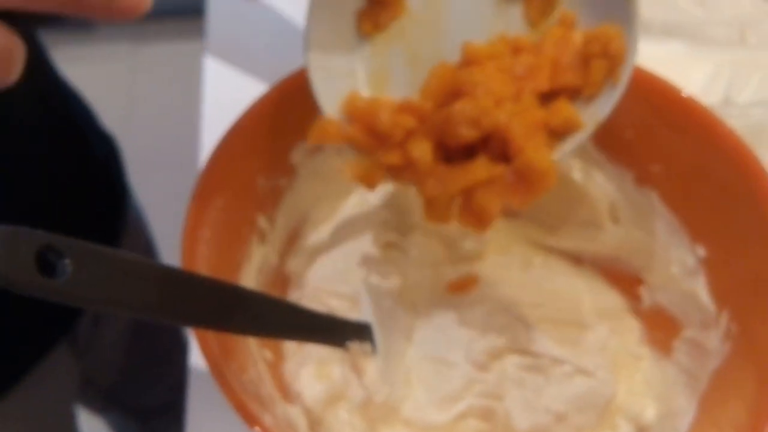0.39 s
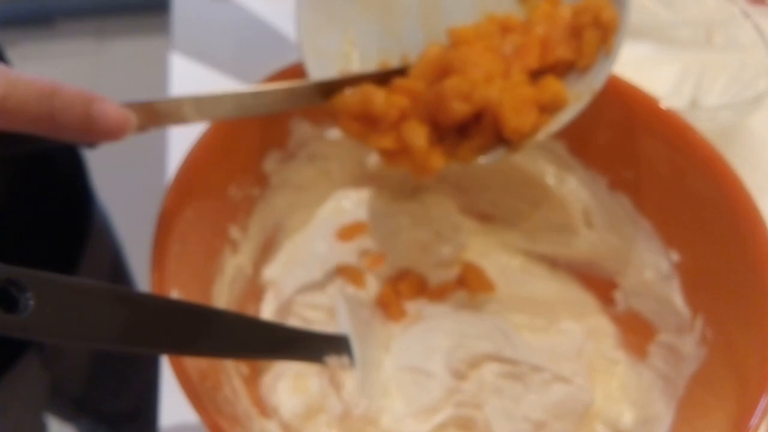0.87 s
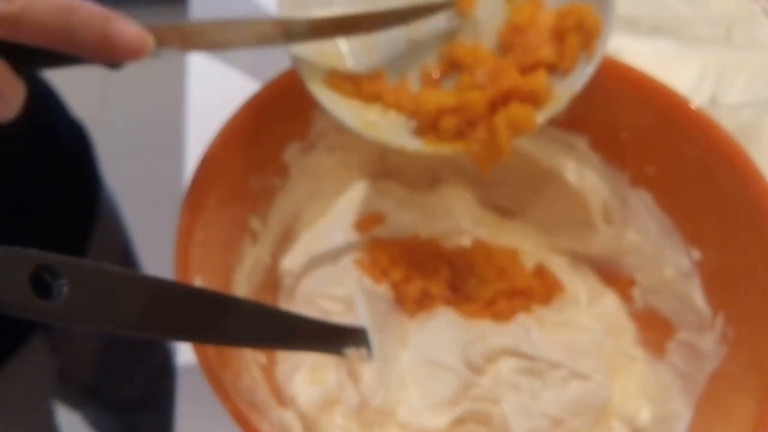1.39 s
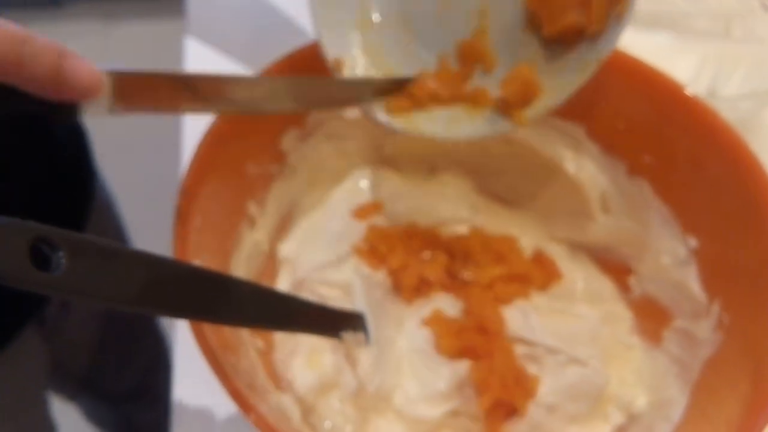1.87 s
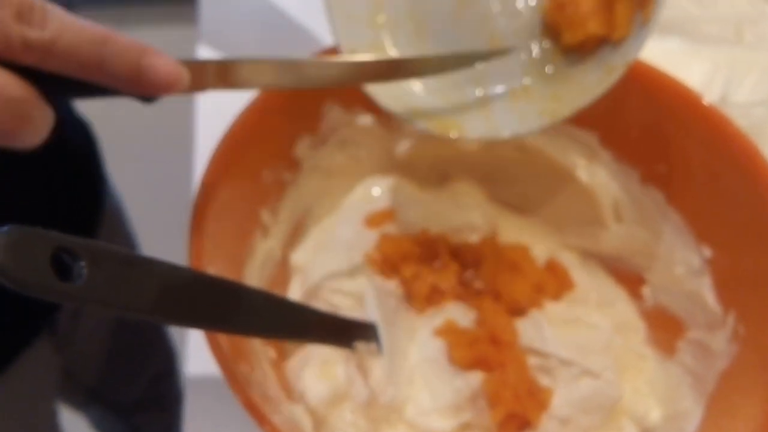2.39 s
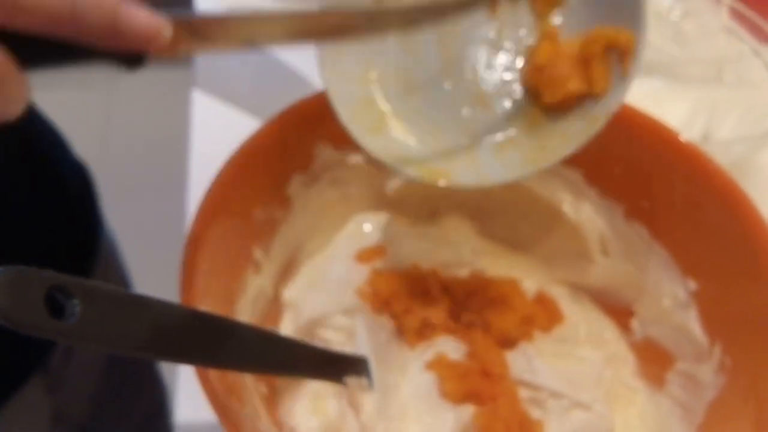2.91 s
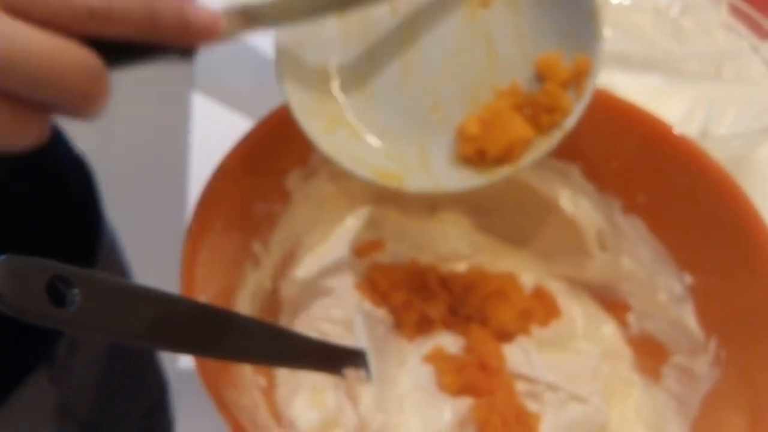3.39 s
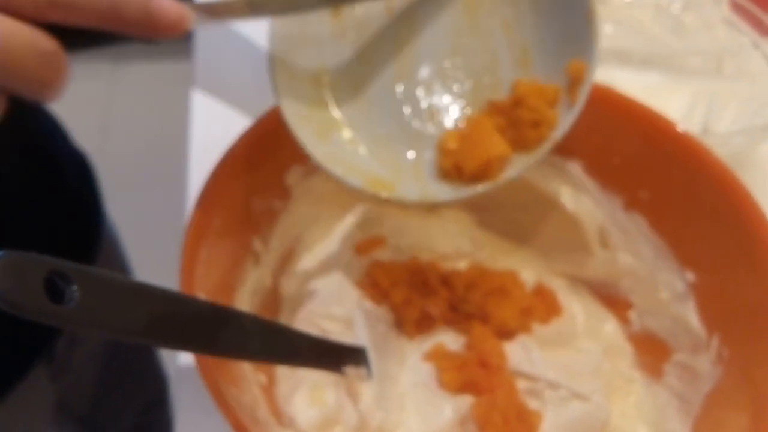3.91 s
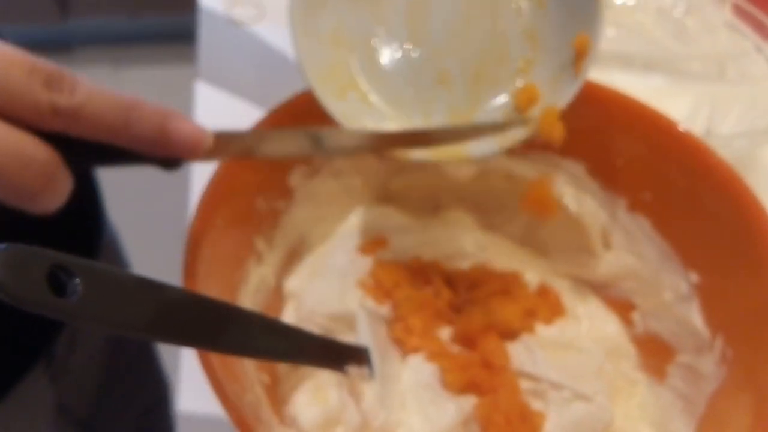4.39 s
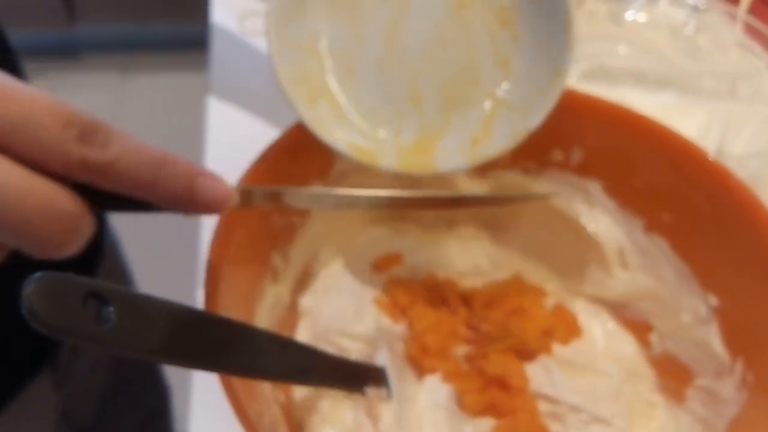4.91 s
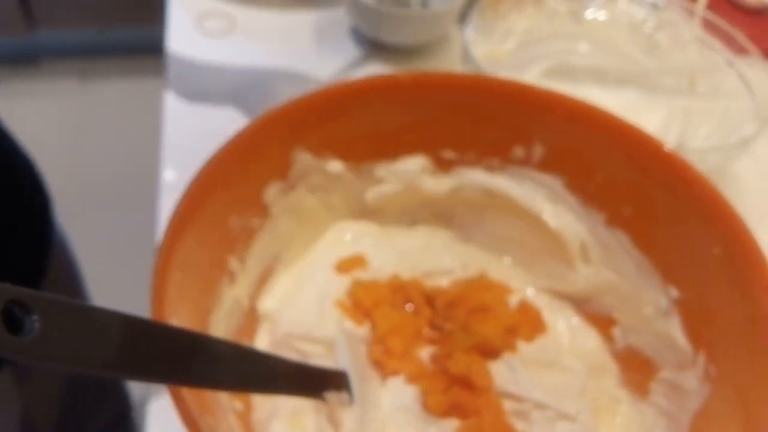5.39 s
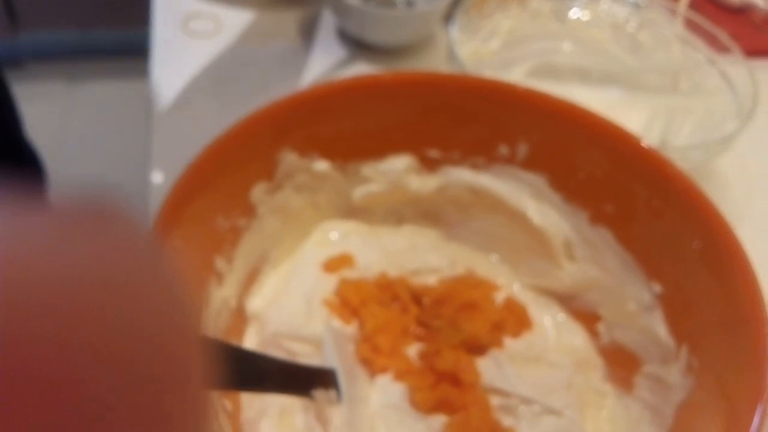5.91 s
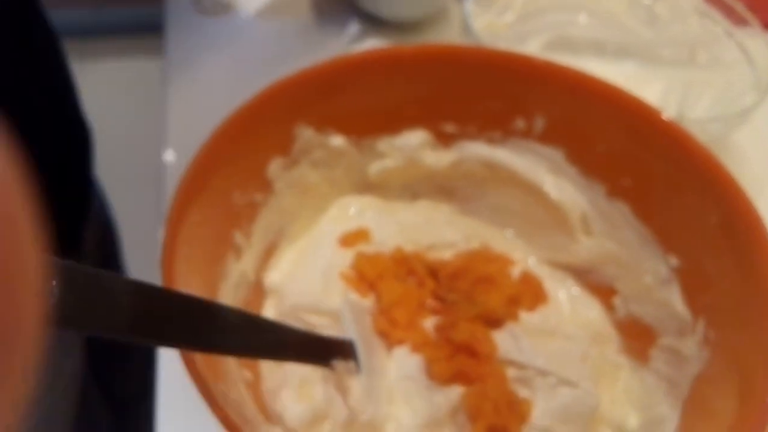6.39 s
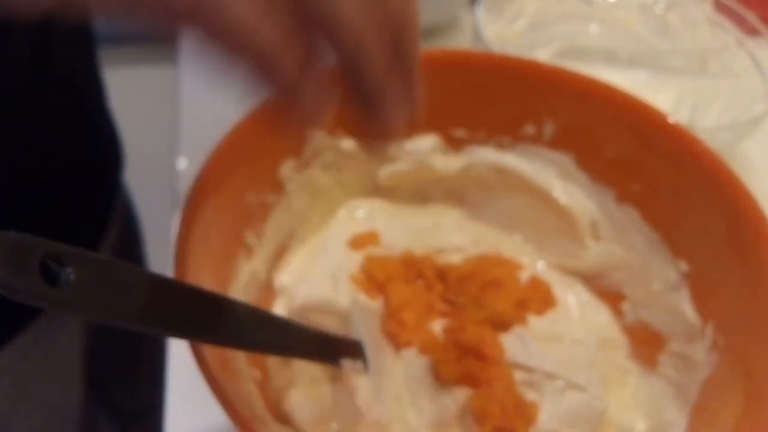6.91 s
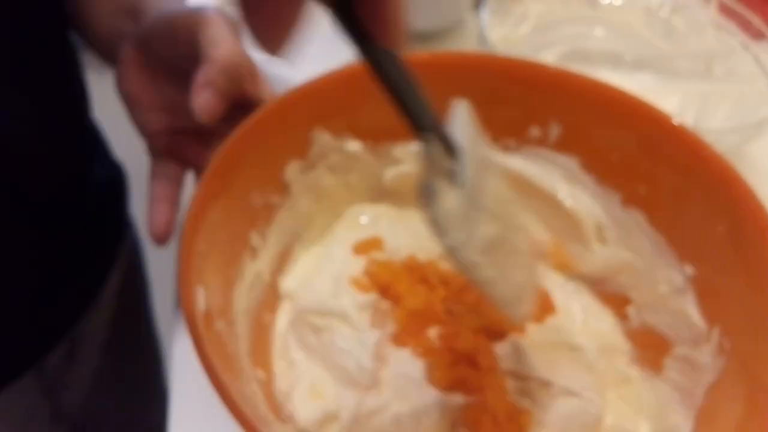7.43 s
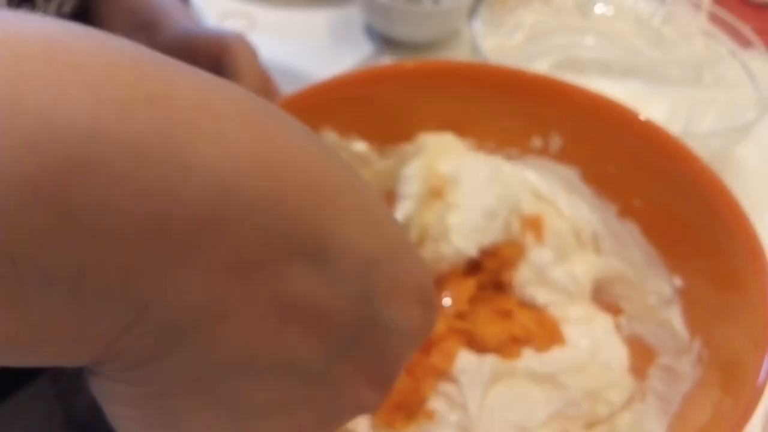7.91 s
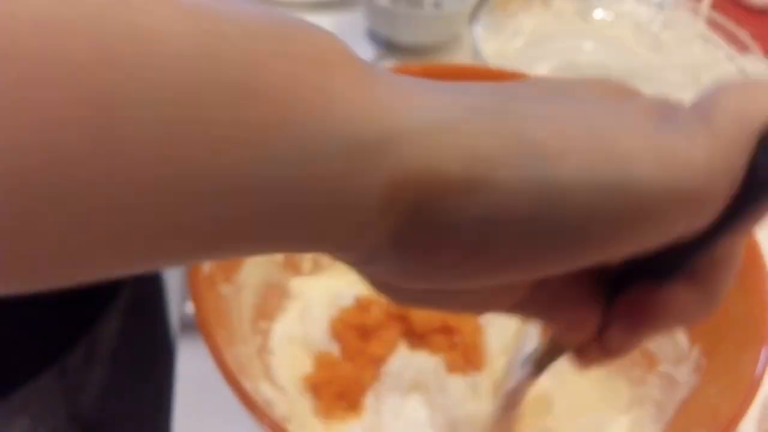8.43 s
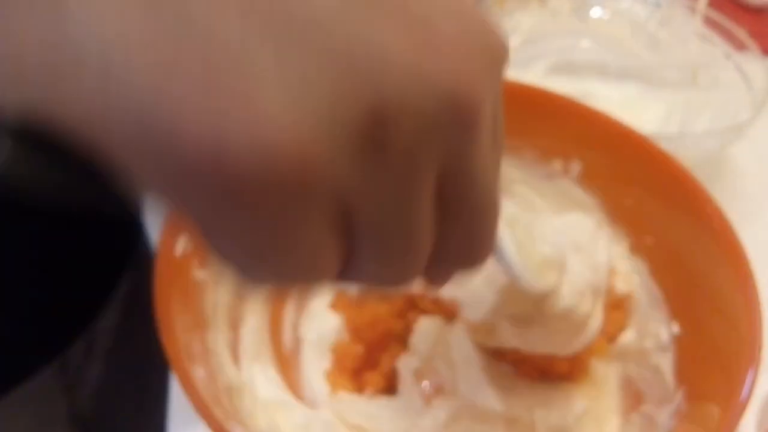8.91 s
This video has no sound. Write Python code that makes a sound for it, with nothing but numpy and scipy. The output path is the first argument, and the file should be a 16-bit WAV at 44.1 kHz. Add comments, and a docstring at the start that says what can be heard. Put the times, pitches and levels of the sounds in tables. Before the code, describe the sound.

Knife-on-dish taps come first, each short, hard and bright, many with a brief gritty scrape. They thin out after about five seconds, with a few last contacts before seven. Then damped plastic knocks, one prominent, and faint soft stirring of cream take over, fading to tiny bumps. A close two-sided microphone in a lightly reverberant kitchen catches low handling rumble, hum and quiet hiss; the dish is crisper on the right.

```python
"""Knife on a dish, spatula on a bowl

A steel knife taps and scrapes fruit off a small ceramic dish: short noise bursts and a chattering rasp
drive the dish's modes. A few knocks come early; most of the spatula's knocking on a plastic bowl, damped
tones with cracks, follows the knife, with stirring. Two microphone ports hear it in a kitchen: for the
dish, the right one is bright and the left one dull. Soft bowl tones, rumble from the counter, folding
cream and room air, all but the tones noise, lie below.
"""
import sys
import numpy as np
from scipy import signal
from scipy.fft import rfft, irfft
from scipy.io import wavfile
from scipy.ndimage import uniform_filter1d

SR = 44100
rng = np.random.default_rng(int(sys.argv[2]) if len(sys.argv) > 2 else 0)


def ratio_of_db(decibels):
    """Turn decibels (scalar or array-like) into linear amplitude factors; 0 dB maps to 1."""
    return 10 ** (np.asarray(decibels, float) / 20)


def to_wav(sig):
    """Store sig (one row per channel, or 1-D mono) as 16-bit WAV at the path in sys.argv[1].

    Samples outside -1..1 are clipped; the rate is SR.
    """
    pcm = np.clip(np.atleast_2d(sig), -1, 1) * 32767
    pcm = np.round(pcm).astype(np.int16)
    wavfile.write(sys.argv[1], SR, pcm.T)  # frames by channels


N = 398663  # length in samples

# Knife meets dish. Each row: start in seconds, relative level in dB, body in dB (how hard the flat of
# the blade drives the lower modes), edge in dB on the upper modes.
KNIFE_TAPS = [(0.037, -46, -14, -6), (0.0858, -31, -6.5, 11), (0.4301, -22, -8, -8), (0.507, -35, -11, -3),
              (0.6196, -42.5, -1, -16), (0.8329, -21, -10, -4), (0.8749, -26.5, -4.5, -4),
              (0.9547, -23, -4, 4.5), (0.9929, -23, -18, -8), (1.0711, -35, 10.5, -17),
              (1.1303, -40.5, 21, -20), (1.2877, -31.5, -23, -28), (1.31, -50, -2, -8),
              (1.4217, -44, -5, -20), (1.4309, -35, -1, -31), (1.533, -22.5, 3, 5),
              (1.6405, -16.5, -23, -16), (1.9209, -14.5, -8.5, -10), (2.3041, -21.5, -6.5, -0.5),
              (2.371, -16.5, -7.5, -4.5), (2.604, -12.5, -11.5, -18), (2.821, -20.5, -7.5, -1),
              (2.8672, -13.5, -18, -6), (3.1553, -20.5, -10, -5), (3.4708, -15.5, -15, -21),
              (3.5512, -12.5, -24, -3.5), (3.7374, -17.5, -9, -11), (3.829, -28, -25, 9),
              (4.0386, -22.5, 0, -27), (4.0852, -23.5, -12, 7), (4.3194, -22.5, 8.5, -0.5),
              (4.3433, -17.5, -2, -9.5), (4.3613, -22, -3, -12), (4.3721, -22.5, -2, -18),
              (4.3804, -17.5, -12, -14), (4.4394, -25, -16, -4), (4.6314, -19, -11.5, -4),
              (4.716, -23.5, -7.5, 0.5), (4.911, -22, 0, 12), (4.9634, -13, -9.5, -11),
              (5.5226, -18.5, -16.5, -16), (5.835, -26.5, -16, -16), (6.1454, -42.5, -12, 2),
              (6.353, -32, -1, -15), (6.399, -22.5, 10.5, -25), (6.6055, -21.5, -1.5, -16),
              (6.6645, -20.5, 7.5, -19)]
# Blade drags over the glaze. Each row: start in seconds, seconds until it presses hardest, relative
# pressure in dB, body in dB, edge in dB.
KNIFE_STROKES = [(0.0, 0.054, -49.5, -4, 8), (0.076, 0.046, -36.5, -14.5, 7.5),
                 (.28, 0.015, -63.5, 6.5, -6), (0.434, .015, -42.5, -2.5, 0), (.47, 0.066, -47.5, -12, -1),
                 (0.615, 0.043, -44, -6.5, 6.5), (.838, 0.036, -40.5, -3.5, 4), (.91, 0.076, -43.5, -6, 9),
                 (0.969, 0.029, -35.5, 1.5, -2), (1.068, 0.014, -39, 2.5, -8), (1.125, 0.0081, -43, 5, 2),
                 (1.542, 0.046, -30.5, 0.5, 4), (1.599, 0.032, -24, -8.5, -5), (1.66, 0.056, -42, -14, 5.5),
                 (1.925, 0.033, -26.5, -21, -4), (1.96, 0.054, -41, -9, 2), (2.07, 0.028, -54, -4, 10),
                 (2.308, .015, -33.5, -13, -1), (2.371, 0.025, -32, -13, -5), (2.58, .012, -59, -14, -7),
                 (2.61, 0.027, -32, -13, -3), (2.826, 0.018, -27.5, -18, -8),
                 (2.867, 0.04, -25.5, -18.5, -5), (3.04, 0.064, -54, -3, -2),
                 (3.16, 0.0094, -29.5, -11.5, 3.5), (3.2, 0.052, -47, -11.5, -10),
                 (3.478, 0.027, -35.5, -13, -6), (3.551, 0.0092, -28.5, -18.5, 8),
                 (3.744, 0.019, -38, -9, -1), (3.8, 0.045, -32.5, -13, 4), (4.045, .015, -51, -8, 6),
                 (4.087, 0.02, -30.5, -11, 4), (4.325, 0.023, -31.5, 0, 4),
                 (4.355, 0.038, -24.5, -8.5, -12), (4.42, 0.048, -33.5, -15, -4),
                 (4.638, 0.018, -40, -4, 2.5), (4.71, 0.0072, -37.5, -15, -7), (4.913, 0.015, -34.5, -3, 2),
                 (4.962, 0.038, -28, -20, -5), (5.529, 0.028, -31.5, -13, -0.5),
                 (5.69, 0.024, -43.5, -12, -3), (5.824, 0.032, -39.5, -13.5, -5),
                 (5.88, 0.032, -50, -7.5, 5), (6.148, .02, -53.5, -7, 8), (6.179, 0.0099, -49, 0.5, 3),
                 (6.2, .05, -50.5, 5.5, 3), (6.355, 0.023, -41, -3, -6), (6.4, 0.023, -33, 12.5, 2.5),
                 (6.44, 0.057, -36, 6, 4), (6.61, 0.035, -37.5, 0.5, 2), (6.664, 0.019, -26, -1, -11),
                 (6.7, 0.039, -34, 0.5, -2)]
# A drag starts below its top pressure, then the blade lifts away.
LANDS_DB, LIFTS_DB_PER_S = -5, 251.5
# Share of the body control that the lowest, low and middle mode groups follow (ratio).
BODY_SHARE = [0.96, 1, 0.53]
# Fixed level of the same three groups (dB).
BODY_OFFSET_DB = [-1, 2.5, 1]

# Crossovers between the five groups of dish modes (Hz).
GROUP_SPLITS_HZ = [2000, 3800, 5900, 7500]
# Dish modes. Each row: frequency in Hz, level in dB, time to fade 60 dB in seconds.
DISH_MODES = [(908, -8, .06), (1147, -8, .04), (1540, -2, .04), (2009, -9, .07), (2237, -6, .09),
              (2346, -8, .07), (2464, -3, .06), (2531, 0, .09), (3080, -12, .05), (3360, -13, .08),
              (4035, -10, .05), (4500, -10, .05), (5050, -7, .07), (5150, -4, .07), (5185, 0, .1),
              (5268, -2, .08), (5700, -9, .05), (6340, -6, .06), (6950, -5, .05), (7047, -3, .07),
              (7116, 0, .08), (7262, -2, .06), (7715, -6, .05), (7810, -4, .06), (7875, -4, .07),
              (8050, 2, .08), (8125, -3, .07)]
# Colour of steel on glaze. Each row: frequency in Hz, level in dB.
GRIT_COLOUR = [(180, -28), (300, -33.5), (662, -19.5), (900, -13.5), (1890, -2.5), (2490, 0.5), (2790, -7),
               (3500, -10), (4680, -14.5), (5240, -13.5), (6570, -12), (7980, -4), (8650, -22), (9400, -26),
               (10400, -28), (12500, -30.5), (14300, -75.5)]
# Modes against grit in each group, low to top (dB).
RING_OVER_GRIT_DB = [-9.5, 4.5, 4, -3.5, 4]
# Fruit and fingers damp the dish, less so as it empties. Each row: time in seconds, level in dB of all
# modes, level in dB of the middle group, which rings most when the rim is let go.
DISH_FREEDOM = [(0, -28, 2), (.6, -10.5, -0.5), (1.1, -3.5, 1.5), (1.3, -16, 2), (1.46, -17, -4),
                (1.55, -2, 3), (1.95, -4.5, -0.5), (2.4, -2, 3.5), (2.65, 1, 2), (3.2, -7.5, 3),
                (3.9, -10, -4), (4.2, -9, -7), (4.4, -0.5, 4.5), (5, 2, -2), (5.6, -1.5, 1),
                (6.2, -8.5, -1.5), (6.7, 2.5, 2.5)]
# The blade's edge rings the upper modes cleanly (dB per dB); each contact colours the grit (dB rms).
EDGE_RINGS, BLOTCH_DB = 0.31, 4
# Tone balance of the two ports. Each row: frequency in Hz, left over right in dB.
PORT_BALANCE = [(300, -14), (1200, -3), (2500, 3), (5000, -5), (6500, -14.5), (8000, -26), (10000, -11),
                (14000, -31)]

# Spatula on the bowl: knocks and small high ticks. Each row: start in seconds, relative level in dB,
# pitch in Hz, relative crack level in dB, left over right in dB.
SPATULA_KNOCKS = [(0.63, -30, 435, -6, -5), (5.023, -39, 246, -1.5, 10), (6.72, -19, 902, -4, -2),
                  (6.85, -37, 180, -37, 22), (6.92, -16.5, 486, -11, 24.5), (6.931, -33, 424, -18, 29),
                  (7.026, -22.5, 510, -13, 16), (7.108, -13.5, 489, -12, 20.5), (7.147, -38, 196, -8, 14),
                  (7.224, -36, 580, -14, 18), (7.361, -21, 527, -9, 18.5), (7.383, -52, 6400, -11, -16),
                  (7.414, -40, 3400, -9, -18), (7.707, -6.5, 883, -19, -4.5), (7.855, -36, 400, -10, 16),
                  (7.8793, -30, 159, 4, 26), (7.915, -36.5, 179, -9.5, 24), (7.925, -35, 336, -8, 17),
                  (7.951, -33.5, 156, -6.5, 27), (7.964, -35.5, 180, -3.5, 17),
                  (7.987, -42, 1100, -14, 2.5), (8.021, -40, 3100, -5, -6), (8.093, -52, 5600, -6, -9),
                  (8.359, -37.5, 158, -24, 13), (8.581, -47, 164, -42, 17), (8.717, -46, 1500, -6, 3),
                  (8.793, -47, 1600, -9, 3), (8.813, -48, 1300, -6, 3)]
# Bowl partials. Each row: multiple of the pitch, level in dB, cycles to fade 60 dB.
BOWL_PARTIALS = [(1, 0.5, 7.5), (1.75, -8, 15.5), (2.45, -10.5, 12), (3.85, -9.5, 12.5)]
# The bowl hums faintly when nudged. Each row: start in seconds, peak in dB, tone in Hz, length in seconds.
BOWL_HOOTS = [(0.624, -45.5, 301.7, 0.15), (2.069, -46.5, 306, 0.12), (2.287, -52.5, 297, 0.074)]
# Fade of the kitchen walls. Each row: frequency in Hz, time to fade 60 dB in seconds.
KITCHEN_FADE = [(300, 0.28), (2000, 0.47), (8000, 0.38), (13000, 0.34)]

# Cream folded over. Each row: loudest moment in seconds, level in dB, rise in seconds per 20 dB,
# fall in seconds per 20 dB.
CREAM_FOLDS = [(6.995, -49, .03, 0.061), (7.5, -79, .1, 0.13), (7.685, -55, .05, .02),
               (7.86, -44, 0.055, .02), (7.99, -57, .02, 0.08), (8.39, -68, 0.063, .03),
               (8.456, -60, .04, .08), (8.715, -49.5, 0.11, 0.051), (8.81, -53, 0.091, 0.059)]
# Colour of the stirring. Each row: frequency in Hz, level in dB.
STIR_COLOUR = [(300, -61), (800, 0), (3000, -14), (6000, -19), (10000, -33)]
# Hands shift the bowl on the counter. Each row: loudest moment in seconds, relative level in dB,
# rise in seconds per 20 dB, fall in seconds per 20 dB.
BOWL_SHIFTS = [(.68, -50, 0.18, 0.18), (1.33, -55, 0.059, 0.024), (1.43, -45, 0.019, 0.064),
               (2.13, -54, 0.13, 0.026), (3.21, -51, 0.11, 0.031), (3.52, -51, 0.25, 0.049),
               (3.75, -38, 0.031, 0.06), (3.88, -46, .05, 0.037), (4.53, -40.5, .07, 0.58),
               (5.03, -50, 0.035, 0.02), (6.42, -39, .03, 0.042), (6.62, -48.5, 0.11, 0.14),
               (6.77, -42, 0.088, 0.1), (6.85, -46, 0.025, 0.045), (6.97, -63, 0.026, .03),
               (7.73, -39, 0.024, 0.064), (7.95, -53, 0.09, 0.051), (8.4, -41, 0.023, 0.031),
               (8.71, -44, 0.087, 0.074)]
# The counter never rests and its level wavers (relative dB, dB rms).
COUNTER_DB, WAVER_DB = -55, 2.5
# Colour of the counter rumble. Each row: frequency in Hz, level in dB.
RUMBLE_COLOUR = [(47, -28.5), (80, -47), (140, 13), (244, 0), (373, 3.5), (417, 2.5), (457, 1), (900, -11),
                 (1170, -29.5), (1980, -120)]
# Width of the rumble. Each row: frequency in Hz, then left over right in dB or likeness of the channels.
RUMBLE_BALANCE, RUMBLE_LIKENESS = [(100, -6.5), (500, 0.5)], [(100, 0.27), (500, 0.71)]
# Low room hum. Each row: frequency in Hz, level in dB.
HUM_COLOUR = [(15, -52), (25, 6.5), (43, -47), (71, -0.5), (97, -50), (130, 2), (163, -5), (213, -2.5),
              (233, -21), (330, -4.5), (362, -19.5), (425, -14), (448, -22), (539, -16.5), (600, -21.5),
              (780, -42), (1320, -120)]
# Room air. Each row: frequency in Hz, level in dB.
HISS_COLOUR = [(290, -51), (500, -17), (608, -3.5), (690, -13.5), (852, -4.5), (1160, -9), (2000, -10.5),
               (2620, -14), (5740, -15.5), (8030, -15), (9370, -30), (12600, -33), (14300, -69)]
HUM_DB, HISS_DB = -55.5, -56.5  # rms levels
# Sides of room and stirring. Each row: frequency in Hz, left over right in dB.
ROOM_BALANCE = [(60, -7), (110, -5.5), (200, -1), (370, -5.5), (670, 1.5), (1230, -0.5), (2250, -1),
                (4130, -1), (7550, -12.5), (13800, 1)]
# Likeness of the two channels. Each row: frequency in Hz, correlation from -1 to 1.
ROOM_LIKENESS = [(60, 0.22), (230, 0.82), (910, -0.13), (3550, -0.043), (13800, -0.087)]

EDGE_HZ = 14200  # top of the whole sound


def knife():
    """Each tap is a short burst into the dish; the strokes lie between."""
    out = strokes()
    t = np.arange(600) / SR
    envelope = (1 - np.exp(-t / 0.0014)) * np.exp(-t / 0.0016)
    bursts = rng.standard_normal((len(KNIFE_TAPS), 600)) * envelope
    answers = dish_groups(KNIFE_TAPS, spot_db=3.5)
    for (s, level_db, *hold), burst, groups in zip(KNIFE_TAPS, bursts, answers):
        response = ratio_of_db(level_db + grip(*hold)) @ groups
        tap = irfft(response * rfft(burst / np.linalg.norm(burst), 8192))
        out[round(s * SR):][:7000] += ratio_of_db(12) * tap[:7000]
    return out


def strokes():
    """A chattering rasp drives each group of dish modes while the blade drags."""
    out, t = np.zeros(N), np.arange(SR // 3) / SR
    shared_slips_db = 2.46 * chatter(N, span=120)
    shifting_contact_db = 3.1 * chatter((5, N), span=300)
    rasp = evened(rng.standard_normal((5, N)) * ratio_of_db(shared_slips_db + shifting_contact_db))
    answers = dish_groups(KNIFE_STROKES, spot_db=2.5)
    for (s, length, top_db, *hold), groups in zip(KNIFE_STROKES, answers):
        start = round(s * SR)
        landing_db = LANDS_DB * (1 - t / length)
        lifting_db = -LIFTS_DB_PER_S * (t - length)
        press_db = top_db + np.minimum(landing_db, lifting_db)
        drive = rasp[:, start:start + len(t)] * ratio_of_db(np.add.outer(grip(*hold), press_db))
        # the band split spreads a little ahead of the click: keep 64 samples of it, then realign
        answer = np.roll(irfft(groups), 64, axis=1)[:, :6000]
        sound = signal.fftconvolve(drive, answer, axes=1).sum(0)[64:]
        out[start:][:len(sound)] += ratio_of_db(-6.5) * sound
    return out


def grip(body_db, edge_db):
    """Level of each group of modes, low to top, for one way of holding the blade."""
    return np.r_[body_db * np.array(BODY_SHARE) + BODY_OFFSET_DB, edge_db, 0]


def dish_groups(rows, spot_db):
    """Spectra of the dish's answer to a click at each contact: short grit plus modes, in five groups."""
    hz = np.fft.rfftfreq(8192, 1 / SR)
    times, edge_db = np.transpose(rows)[[0, -1]]
    blotches_db = BLOTCH_DB * chatter((len(rows), 2049), span=30)
    colours_db = read(GRIT_COLOUR, np.fft.rfftfreq(4096, 1 / SR)) + blotches_db
    grit = np.array([causal(db) for db in colours_db])

    # each spot favours other modes, with either sign
    chance = rng.standard_normal((len(rows), len(DISH_MODES), 2))
    spots = np.sign(chance[..., 0]) * ratio_of_db(spot_db * chance[..., 1])
    modes = spots @ ring(DISH_MODES, size=6000)

    lowpasses = [1 / (1 + (hz / split) ** 12) for split in GROUP_SPLITS_HZ]
    bands = np.diff([0 * hz, *lowpasses, 1 + 0 * hz], axis=0)
    grit, modes = (rfft(v, 8192)[..., None, :] * bands for v in (grit, modes))
    grit, modes = (v / np.linalg.norm(v, axis=-1, keepdims=True) for v in (grit, modes))

    s, free_db, rim_db = np.transpose(DISH_FREEDOM)
    ring_db = np.add.outer(np.interp(times, s, free_db), RING_OVER_GRIT_DB)
    ring_db[:, 3] += EDGE_RINGS * np.maximum(edge_db, 0)
    groups = grit + ratio_of_db(ring_db)[..., None] * modes
    groups /= np.linalg.norm(groups, axis=-1, keepdims=True) / 64  # about unit energy in time
    groups[:, 2] *= ratio_of_db(np.interp(times, s, rim_db))[:, None]
    return groups


def scatter(x, cycles_per_s=2.7):
    """Three sets of quick echoes, others to each port, fade into each other at a steady rate."""
    shape = (3, 2, 900)
    fade = ratio_of_db(-60 * np.arange(900) / SR / .03)
    echoes = rng.standard_normal(shape) * (rng.random(shape) < .05) * fade
    # echoes against the direct sound: 9 dB at the left port, -3 dB at the right
    echoes *= ratio_of_db(np.array([[9], [-3]])) / np.linalg.norm(echoes, axis=2, keepdims=True)
    echoes[:, :, 0] = 1
    echoes /= np.linalg.norm(echoes, axis=2, keepdims=True)
    # the squared shares of the three sets always sum to 1
    phase = cycles_per_s * np.arange(N) / SR + np.arange(3)[:, None] / 3
    share = (2 / 3) ** .5 * abs(np.cos(2 * np.pi * phase))
    return signal.oaconvolve((share * x)[:, None], echoes, axes=2)[:, :, :N].sum(0)


def ports(x):
    """The left port loses the treble of the dish and hears it a little late."""
    tilt_db = read(PORT_BALANCE, np.fft.rfftfreq(4096, 1 / SR))
    right_db = -20 * np.log10((1 + ratio_of_db(2 * tilt_db)) ** .5 / 2)  # keeps the summed power even
    left = np.r_[np.zeros(10), causal(right_db + tilt_db)]
    right = np.r_[causal(right_db), np.zeros(10)]
    return signal.oaconvolve(x, [left, right], axes=1)[:, :N]


def spatula():
    """Each knock or tick is a damped tone with the bowl's overtones and a short crack."""
    out, t = np.zeros((2, N + 4000)), np.arange(4000) / SR
    crack_band = np.r_[signal.butter(1, [1100, 3600], "band", fs=SR, output="sos"),
                       signal.butter(2, 8500, fs=SR, output="sos")]
    noises = rng.standard_normal((len(SPATULA_KNOCKS), 3, 4000))
    for (s, level_db, hz, crack_db, pan_db), noise in zip(SPATULA_KNOCKS, noises):
        partials = [(k * hz, db, cycles / (k * hz)) for k, db, cycles in BOWL_PARTIALS if k * hz < EDGE_HZ]
        tone = ring(partials, size=4000).sum(0) * (1 - np.exp(-t / 0.0014))
        # one noise shared by the ports and one for each
        grit = (noise[0] + 2.15 * noise[1:]) * (1 - np.exp(-t / 0.0022)) * ratio_of_db(-60 * t / 0.011)
        knock = tone + ratio_of_db(crack_db + 10.5) * signal.sosfilt(crack_band, grit)
        sides_db = np.array([[pan_db / 2], [-pan_db / 2]])
        out[:, round(s * SR):][:, :4000] += knock * ratio_of_db(level_db + sides_db)
    return signal.sosfilt(signal.butter(2, 110, "high", fs=SR, output="sos"), out[:, :N])


def hoots():
    """The nudged bowl gives soft swells of one low tone: sines under half-sine envelopes."""
    out = np.zeros(N)
    for s, db, hz, length in BOWL_HOOTS:
        t = np.arange(0, length, 1 / SR)
        swell = np.sin(np.pi * t / length)
        out[round(s * SR):][:len(t)] += ratio_of_db(db) * swell * np.sin(2 * np.pi * hz * t)
    return out


def kitchen(x):
    """Walls as sparse taps of random sign, each band dying at its own speed, other taps per port."""
    taps = np.zeros((2, SR // 2))
    slots = np.arange(200, SR // 2 - 20, 20)
    at = slots + rng.integers(0, 20, (2, len(slots)))
    np.put_along_axis(taps, at, rng.choice([-1., 1.], at.shape), 1)
    hz, t, z = signal.stft(taps, SR, nperseg=256)
    fade = ratio_of_db(-60 * t / read(KITCHEN_FADE, hz)[:, None])
    tail = signal.istft(z * fade, SR, nperseg=256)[1]
    return signal.fftconvolve(x, tail / np.linalg.norm(tail[0]), axes=1)[:, :N]


def stirring():
    """Cream folding over: patchy noise that swells with each fold."""
    return air(STIR_COLOUR, ROOM_BALANCE, ROOM_LIKENESS, swells(CREAM_FOLDS), patchy_db=8.5, size=256)


def counter_rumble():
    """Low noise through the counter: a wavering floor, louder as hands shift the bowl."""
    level = ratio_of_db(COUNTER_DB + WAVER_DB * chatter(N, span=3000)) + ratio_of_db(swells(BOWL_SHIFTS))
    return level * air(RUMBLE_COLOUR, RUMBLE_BALANCE, RUMBLE_LIKENESS, level_db=-3, patchy_db=2.5)


def room_air():
    """Steady room noise: a low hum band and a hiss band."""
    hum = air(HUM_COLOUR, ROOM_BALANCE, ROOM_LIKENESS, HUM_DB, patchy_db=2.0, size=4096)
    return hum + air(HISS_COLOUR, ROOM_BALANCE, ROOM_LIKENESS, HISS_DB, patchy_db=1.5)


def air(colour, balance, likeness, level_db, patchy_db, size=1024):
    """Two-channel noise of a given colour with small drifting patches."""
    frames, hz = N * 4 // size + 5, np.fft.rfftfreq(size, 1 / SR)
    a, b, c, d, patches = rng.standard_normal((frames, len(hz), 5)).T
    patches = evened(uniform_filter1d(uniform_filter1d(patches, 10, 0), 12, 1))
    like = np.clip(read(likeness, hz), -1, 1)[:, None]
    left = a + 1j * b
    right = like * left + np.sqrt(1 - like ** 2) * (c + 1j * d)
    z = np.array([left, right])
    z *= ratio_of_db(read(colour, hz)[:, None] + patchy_db * patches)
    z *= ratio_of_db(np.outer([.5, -.5], read(balance, hz)))[:, :, None]
    noise = signal.istft(z, nperseg=size, noverlap=size * 3 // 4)[1][:, :N]
    return ratio_of_db(level_db) * evened(noise)


def swells(rows):
    """Sum of level humps in dB; rise and fall are the times to change by 20 dB."""
    t = np.arange(N) / SR
    humps = (ratio_of_db(db - 20 * np.maximum((s - t) / rise, (t - s) / fall)) for s, db, rise, fall in rows)
    return 20 * np.log10(sum(humps) + 1e-9)


def chatter(shape, span):
    """Slow chance of rms 1 that changes over span samples."""
    return evened(uniform_filter1d(uniform_filter1d(rng.standard_normal(shape), span), span))


def ring(modes, size):
    """One dying sine per mode."""
    hz, db, t60 = np.transpose(modes)[:, :, None]
    t = np.arange(size) / SR
    return ratio_of_db(db - 60 * t / t60) * np.sin(2 * np.pi * hz * t)


def causal(db):
    """Minimum-phase impulse response of a gain given in dB on 2049 bins."""
    log_gain = np.log(ratio_of_db(np.maximum(np.r_[db, db[-2:0:-1]], -100)))
    return np.fft.ifft(np.exp(np.conj(signal.hilbert(log_gain)))).real[:2048]


def read(points, hz):
    """Reads a table along a log-frequency axis."""
    f, value = np.transpose(points)
    return np.interp(np.log(hz + 1), np.log(f + 1), value)


def evened(x):
    """Scales to rms 1."""
    return x / np.sqrt(np.mean(x ** 2) + 1e-20)


def scene():
    """Dish through echoes and ports, knocks close by, kitchen walls, then the softer layers."""
    dish = ports(scatter(knife()))
    knocks = spatula()
    # only the right side of the knocks reaches the walls: those right at the left port stay dry
    walls = kitchen(ratio_of_db(-13.0) * dish + ratio_of_db(-10.5) * knocks[1])
    return dish + knocks + walls + hoots() + stirring() + counter_rumble() + room_air()


def roll_off(x):
    """The treble ends steeply here."""
    return signal.sosfilt(signal.butter(12, 14420, fs=SR, output="sos"), x)


def record(dry):
    """Limits the band with a steep linear-phase low-pass and finishes the mix."""
    lowpass = signal.firwin(255, EDGE_HZ, window=("kaiser", 9), fs=SR)
    mix = signal.oaconvolve(dry, lowpass[None], "same", axes=1)
    return roll_off(mix)


dry = scene()
out = record(dry)
to_wav(out)
```